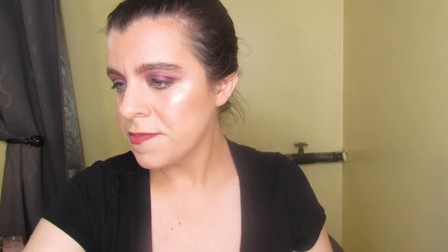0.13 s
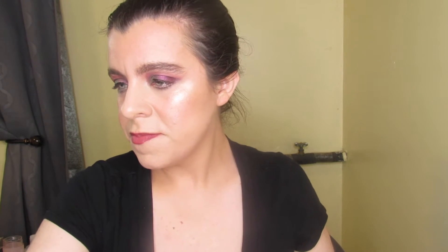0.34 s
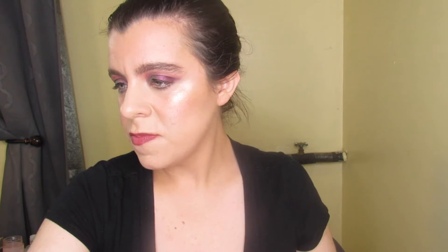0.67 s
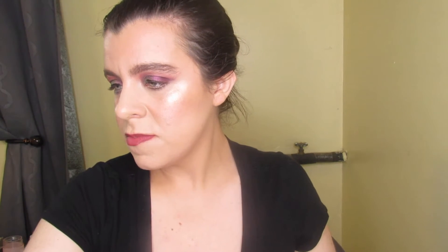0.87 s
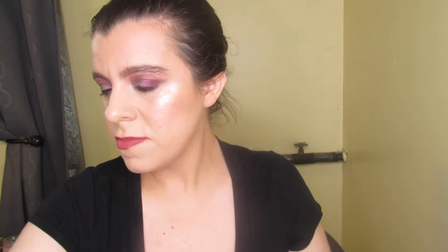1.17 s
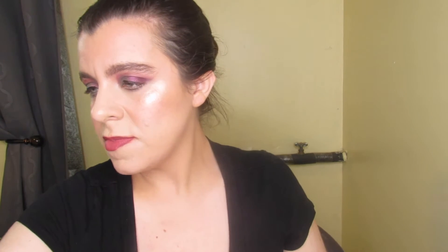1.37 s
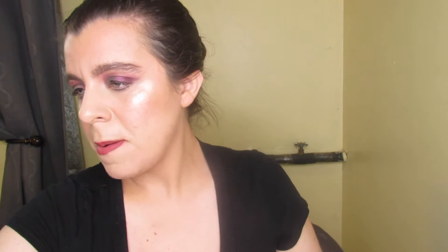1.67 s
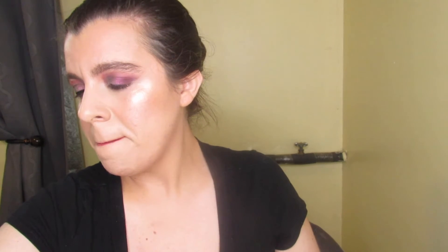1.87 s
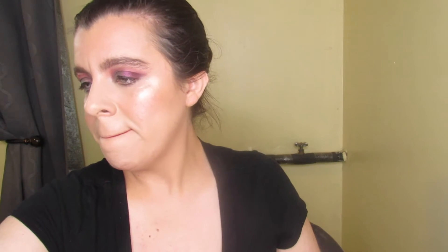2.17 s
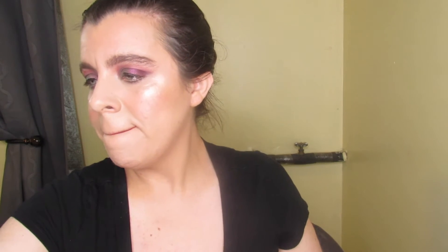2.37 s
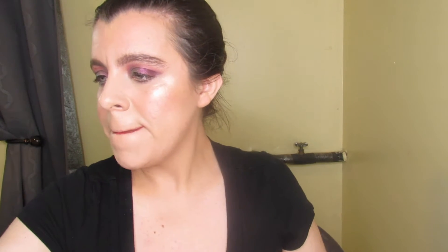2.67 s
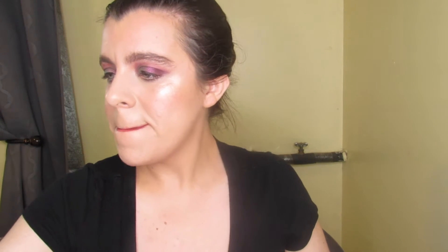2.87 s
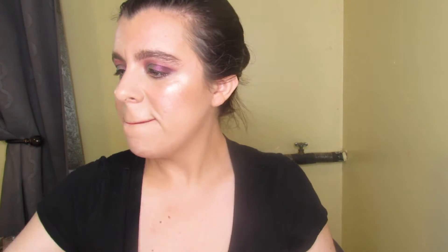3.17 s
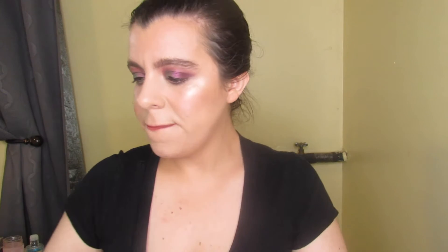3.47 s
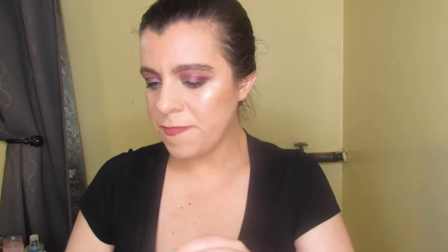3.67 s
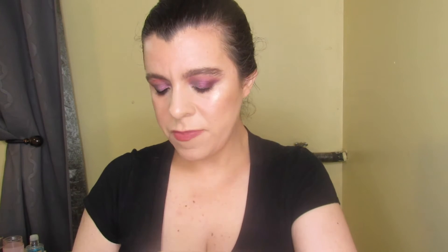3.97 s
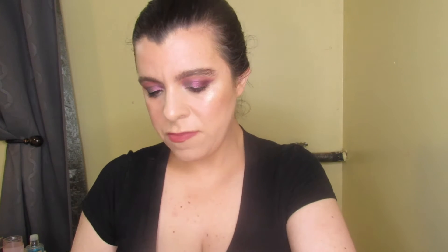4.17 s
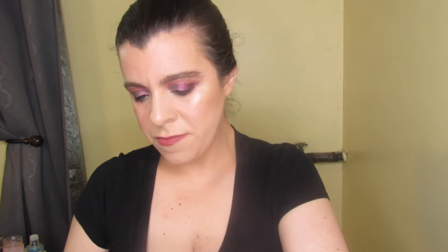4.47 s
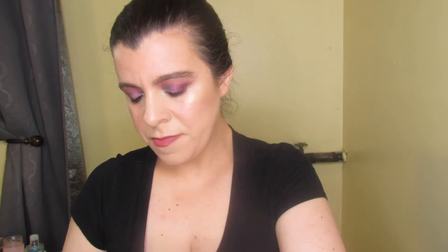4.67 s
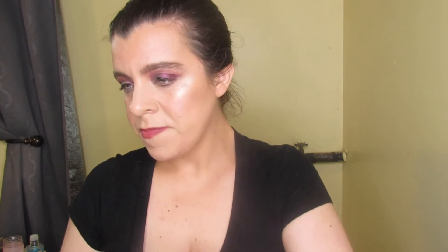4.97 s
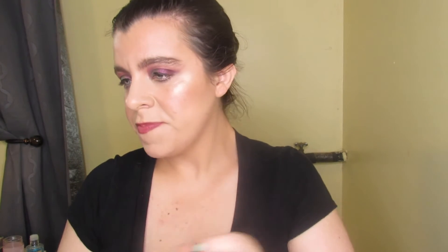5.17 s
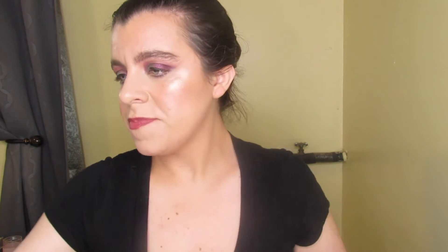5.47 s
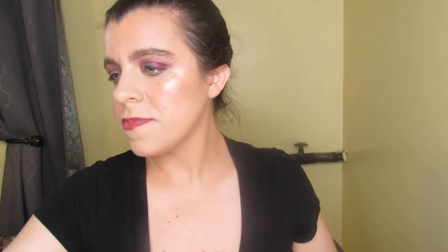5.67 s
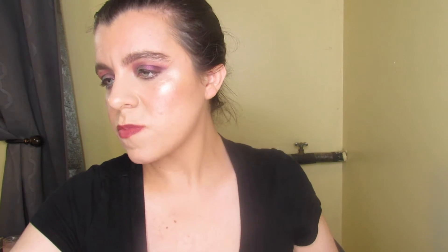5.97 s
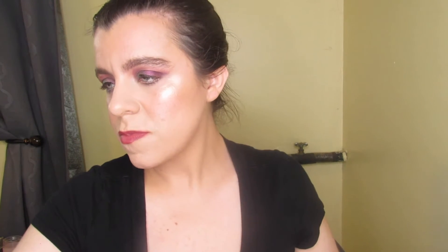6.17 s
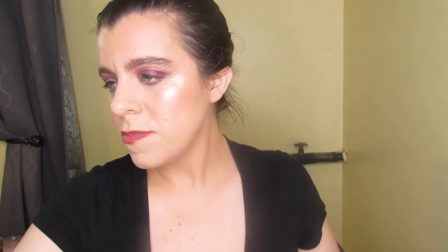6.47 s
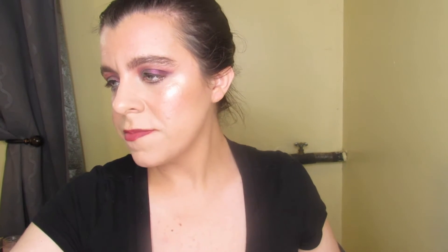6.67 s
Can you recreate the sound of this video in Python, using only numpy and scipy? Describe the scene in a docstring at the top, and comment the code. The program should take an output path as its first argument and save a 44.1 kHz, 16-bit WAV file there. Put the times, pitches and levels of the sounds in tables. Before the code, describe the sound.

Plastic make-up containers are handled on a table in a small bare room, close to a stereo microphone pair. Sharp clacks come in a cluster early on, then soft slides and nudges, a few light clicks in the hand, a bright rattling burst around the middle, and a final dense run of knocks with rubbing. A faint low hum lies beneath.

```python
"""A faint steady hum, a brief slide and a soft nudge open the scene; then plastic make-up containers are
picked up, knocked together and set down on a table in a small, bare room, close to the microphone pair.
Each contact is a short dense clack of shaped noise bands plus decaying sines: the container's clearer ring
and, as weight reaches the table, its boom. Slides are noise with uneven catches, also fed to table resonators.
The room tone is coloured noise with a few sine hum lines."""
import sys
import numpy as np
from scipy import signal
from scipy.io import wavfile
from scipy.ndimage import map_coordinates

SR = 44100
rng = np.random.default_rng(int(sys.argv[2]) if len(sys.argv) > 2 else 0)


def wav_out(sig):
    """Save sig, one row per channel (or a flat mono array), as 16-bit PCM at SR to the path in sys.argv[1]."""
    wavfile.write(sys.argv[1], SR, np.round(np.clip(np.atleast_2d(sig).T, -1, 1) * 32767).astype(np.int16))


N = 301203
TIME = np.arange(N) / SR
RING_SAMPLES, ATTACK_SAMPLES = 20000, 970
AGE = TIME[:RING_SAMPLES]   # seconds since a contact
BAND_EDGES_HZ = np.geomspace(22, 16500, 25)
BANDS_HZ = np.sqrt(BAND_EDGES_HZ[1:] * BAND_EDGES_HZ[:-1])


def from_db(db):
    """Decibels to gain."""
    return 10 ** (np.asarray(db) / 20)


def at_hz(points, hz, axis=1):
    """Read one column of a table along log frequency."""
    points = np.array(points)
    return np.interp(np.log(hz), np.log(points[:, 0]), points[:, axis])


def pan(db):
    """Left and right gains for a level difference."""
    return from_db([[db / 2], [-db / 2]])


def noise_bands(image):
    """Stereo noise in narrow bands, each of rms 1: bands x channels x N."""
    white = rng.standard_normal((2, 2, N))
    bands = []
    for k, hz in enumerate(BANDS_HZ):
        band_pass = signal.butter(2, BAND_EDGES_HZ[k:k + 2], "band", fs=SR, output="sos")
        mid, side = signal.sosfilt(band_pass, white[k % 2])
        alike = np.clip(at_hz(image, hz), -.99, .99)
        pair = np.sqrt(1 + alike) * mid + np.sqrt(1 - alike) * side * [[1], [-1]]
        pair = pair * pan(at_hz(image, hz, axis=2))
        bands.append(pair / pair.std())
    return np.array(bands, dtype=np.float32)


def coloured(bands, spectrum):
    """Sum noise bands to a spectrum given per Hz; rms about 1."""
    gains = from_db(at_hz(spectrum, BANDS_HZ)) * np.sqrt(BANDS_HZ)   # bands widen with frequency
    gains = gains / np.linalg.norm(gains)
    return np.einsum("b,bcn->cn", gains.astype(np.float32), bands)


# colour of the room tone: f/Hz, relative level/dB per Hz
ROOM_TONE = [(15, -57), (25, -25), (46, -11), (107, 0.5), (267, -6.5), (349, -10.5), (378, -9), (469, -7),
             (762, -23.5), (1020, -19), (1620, -25), (2060, -30), (5010, -40), (13900, -37), (15500, -71)]
# steady hum lines: f/Hz, level/dB before the common hum trim
HUM = [(96.9, -70.5), (597.5, -62), (834.4, -65), (1012, -61.5), (1130, -65.5), (1427, -68.5)]
# room tone at the microphones: f/Hz, left-right likeness (held within +-0.99), L-R level/dB
TONE_IMAGE = [(40, -2.6, 30), (84, -0.52, 3.5), (192, -0.82, 1.5), (430, -0.45, 2.5), (1210, 0.17, 0.5),
              (4000, 0.45, 1.5), (12000, -0.06, 0)]


def room_tone(air_db=-45.0, hum_trim_db=-2.0):
    """Steady rumble and hiss from coloured noise, with a few faint sine hum lines."""
    air = from_db(air_db) * coloured(noise_bands(TONE_IMAGE), ROOM_TONE)
    hum = np.zeros(N)
    for hz, db in HUM:
        line = np.sin(2 * np.pi * (hz * TIME + rng.random()))
        hum += from_db(db + hum_trim_db) * np.sqrt(2) * line   # root 2: rms 1
    return air + hum * pan(4.4)


# things are pushed across the table: t/s, length/s, rub level/dB, pressure on the table/dB re the rub
SLIDES = [(0.0, 0.038, -39, -7), (0.25, 0.22, -46.5, -5.5), (0.665, 0.034, -51.5, 13),
          (0.977, 0.035, -49, 11), (1.255, 0.14, -35, 0.5), (1.57, 0.17, -56, 0), (1.892, 0.25, -51, 6),
          (2.21, 0.12, -43.5, -6), (2.657, 0.26, -43.5, 0), (5.623, 0.065, -51, -6), (5.894, 0.5, -44, 4.5),
          (6.29, 0.3, -39, 5), (6.497, 0.19, -41, 11)]


def pushing(attack_s=0.027, release_s=0.069):
    """Each push gathers speed, holds, then dies away: how strongly it rubs, and drives the table."""
    rubbing, pressing = np.zeros((2, N))
    for s, length, db, pressure_db in SLIDES:
        attack = np.clip((TIME - s) / attack_s, 0, 1)
        release = np.exp(-np.clip((TIME - s - length) / release_s, 0, 20))
        rubbing += from_db(db) * attack * release
        pressing += from_db(db + pressure_db) * attack * release
    return rubbing, pressing


# colour of the sliding: f/Hz, relative level/dB per Hz
RUB = [(30, -55), (100, -23), (180, -5), (260, -2.5), (380, -6), (520, -4), (700, -12), (1200, -12),
       (2000, -17.5), (4000, -28.5), (12000, -38)]


def sliding(bands, rough_db=4.0, catches_per_s=45, rub_db=-5.5):
    """Things slide in small uneven catches, which set the table humming."""
    knots = np.cumsum(rng.exponential(1 / catches_per_s, size=900))
    catches = np.interp(TIME, knots, rng.standard_normal(len(knots)))
    rubbing, pressing = pushing()
    rub = from_db(rub_db + rough_db * catches) * coloured(bands, RUB)
    return rub * rubbing + table_hum(rub * pressing)


# table top: f/Hz, relative level/dB, t60/s (t60 is for blows; sliding uses one resonator width)
TABLE_MODES = [(186.7, -12.5, 0.34), (256.6, 0, 0.23), (286.2, -6, 0.12), (338, -9.5, 0.23),
               (367.5, -2.5, 0.22), (434, -17.5, 0.3), (486, -6, 0.1), (578, -15, 0.29)]


def table_hum(drive, table_db=2.0, width_hz=16):
    """Rubbing excites the table's modes, favouring those strong under the container in hand."""
    starts, favoured_hz, _ = zip(*IN_HAND)
    held = np.searchsorted(starts[1:], TIME)
    out = np.zeros((2, N))
    for hz, db, _ in TABLE_MODES:
        push = drive * from_db(db + table_db) * favour(hz, np.array(favoured_hz))[held]
        out += signal.lfilter(*signal.iirpeak(hz, hz / width_hz, fs=SR), push)
    return out


def favour(hz, favoured_hz, favour_db=11.0, favour_octaves=0.11):
    """Gain of a table mode: the one with an antinode under the container is driven hardest."""
    return from_db(favour_db * np.exp(-(np.log2(hz / favoured_hz) / favour_octaves) ** 2))


def table_boom(force, favoured_hz, table_db=-6.5, swell_s=0.0019):
    """The table's modes swell over a few milliseconds; every blow pushes the top the same way."""
    out = np.zeros((2, RING_SAMPLES))
    for hz, db, t60 in TABLE_MODES:
        gain = from_db(at_hz(force, hz) + db + table_db) * favour(hz, favoured_hz)
        out += gain * mode(hz, t60, swell_s, start_turns=0)
    return out


# soft nudges of things that stay on the table: t/s, clack level/dB, weight on the table/dB re the clack
NUDGES = [(0.002, -54.5, 6), (0.363, -56, 2), (1.405, -38.5, -1.5), (2.104, -46, 1), (2.197, -43, 5),
          (2.286, -40.5, -1), (2.318, -43, 4.5), (2.61, -42.5, 2.5), (2.769, -40.5, -1), (2.867, -46, 7.5),
          (5.998, -48.5, 8), (6.208, -48, 9.5), (6.288, -31.5, 2.5), (6.775, -44, -1)]


def nudges():
    """Dull soft contacts: all share one snap, tick, spot ring and clack decay."""
    snap_db, tick_db, ring_hz, t60_s = -13, -26, 1175, 0.048
    return [(s, db, weight, snap_db, tick_db, ring_hz, t60_s) for s, db, weight in NUDGES]


# containers click together in the hand, clear of the table:
# t/s, clack level/dB, snap/dB and tick/dB re the clack, spot ring f/Hz, clack t60/s
CLICKS = [(0.211, -58.5, 5.5, -8, 1017, 0.15), (1.141, -47, -8, -21, 1460, .1),
          (1.979, -50, 0.5, 4, 970, .076), (2.965, -49, -7, -20, 1443, 0.075),
          (3.067, -37, -4, -19, 1270, 0.039), (3.181, -29, -3.5, -21.5, 1530, .27),
          (3.324, -42, -10, -12.5, 2050, 0.16), (3.494, -37.5, -9.5, -23, 964, 0.083),
          (4.453, -56, -10, -20, 1090, .1), (4.748, -18.5, -1, -13, 930, 0.12),
          (4.921, -43, 3, -14, 1090, 0.045), (5.056, -26, -7.5, -22.5, 1594, .1),
          (5.124, -22.5, -12.5, -22, 1644, 0.072), (5.1466, -20, 0.5, -7, 1790, 0.11),
          (5.158, -14.5, -6.5, -22, 1700, 0.27), (5.346, -30, -2.5, -17.5, 1350, 0.13),
          (5.372, -20, -2, -7.5, 1430, .11), (5.602, -30.5, -1, -13.5, 2820, 0.043),
          (5.653, -37.5, -5.5, -21, 1800, 0.04)]


def clicks(weight_db=-14):
    """Containers click together in the hand, which passes little weight to the table."""
    return [(s, db, weight_db, snap, tick, hz, t60) for s, db, snap, tick, hz, t60 in CLICKS]


# a container meets the table: t/s, clack level/dB, then re the clack: weight on the table/dB,
# shell's snap/dB, edge's tick/dB; spot ring f/Hz, clack t60/s
KNOCKS = [(0.539, -47, -3.5, 6.5, -0.5, 1490, 0.077), (0.7742, -15.5, 2, -9, -20, 1626, 0.095),
          (0.8525, -16, -10.5, -10.5, -19.5, 1550, .18), (0.899, -31, 1, -1, -30, 1680, 0.12),
          (1.1651, -22, -10.5, 0, -14, 1373, .08), (1.199, -18, -4, -6, -14, 1230, .12),
          (1.252, -27.5, -6, -4, -33, 1200, 0.23), (1.3047, -22, -22, 0, -16, 1840, .19),
          (1.495, -38.5, -4, -11, -17, 1190, .082), (1.508, -27, -8.5, -22, -22, 1405, 0.066),
          (1.533, -25.5, -4.5, 1.5, -14.5, 1280, 0.051), (1.614, -36.5, -18, -13, -32, 1600, .11),
          (2.789, -25, 0.5, -11, -28.5, 1210, 0.18), (5.8464, -27.5, 3, -5.5, -16.5, 1850, 0.23),
          (5.949, -40, 1, -5, -20, 1290, 0.057), (6.046, -30, -7.5, -8.5, -23, 1096, 0.15),
          (6.143, -36, -12, -9, -31, 1290, 0.21), (6.245, -25, -17, -8, -20.5, 1130, .24),
          (6.265, -17, -6.5, -7, -26, 1100, 0.15), (6.478, -22.5, -1.5, -4, -18.5, 1170, 0.89),
          (6.5148, -20.5, 3, 3, -11, 1610, 0.098), (6.526, -29.5, 4.5, -4, -12, 1530, 0.081),
          (6.632, -21, -0.5, -0.5, -20.5, 1520, 0.074)]


def knocks():
    """Containers strike the table, each with its own weight, snap and tick."""
    return list(KNOCKS)


# where thump, knock, clack, snap and tick lie: f/Hz
REGISTERS_HZ = [250, 440, 1330, 3300, 8000]


def blow_force(db, weight, snap, tick, favoured_hz, thump_db=-8.5, thump_per_weight=1.77):
    """Spectrum of a blow, (f/Hz, level/dB): heavy ones thump, most on a deep-sounding spot of the table."""
    # weight sets the knock and, more steeply, the thump below it
    deep_db = 20 * np.log10(favour(REGISTERS_HZ[0], favoured_hz))
    thump = thump_db + thump_per_weight * weight + deep_db
    return np.column_stack([REGISTERS_HZ, db + np.array([thump, weight, 0, snap, tick])])


def dying(t60):
    """A decay of 60 dB in t60 seconds."""
    return np.exp(-np.log(1000) / t60 * AGE)


def swelling(seconds):
    """A rise from 0 to 1 with this time constant."""
    return 1 - np.exp(-AGE / seconds)


def unit_attack(x):
    """Scale a stereo ring to rms 1 over its first moments."""
    return x / np.sqrt(np.mean(x[..., :ATTACK_SAMPLES] ** 2, axis=(-2, -1), keepdims=True))


def rebounds(t60, gap_s=0.018, sting_s=0.00069, spread_db=-12.0, weaker_db=-6.5, count=5):
    """A light container never lands flat: after the first sting its edges touch again at uneven gaps."""
    out = np.exp(-AGE / sting_s)
    touches = np.cumsum(rng.exponential(gap_s, count))
    for s, size in zip(touches, rng.standard_normal(count)):
        # later touches tend to be weaker, with random spread
        gain = from_db(weaker_db + spread_db * min(size, 1) - 60 * s / t60)
        out += gain * (AGE >= s) * np.exp(-np.abs(AGE - s) / sting_s)
    return out


def clack(bands, levels_db, t60, room_tail, rise_s=0.0013, low_rise_cycles=0.069,
          rebound_db=-1.5, chatter_db=0.15, chatter_s=0.00564):
    """Dense shell modes as fast-dying noise with rebounds, over the room's tail; lows rise more slowly."""
    start = rng.integers(N - RING_SAMPLES)
    shape = dying(t60) + from_db(rebound_db) * rebounds(t60) + room_tail
    # uneven echoes make the decay lumpy
    lumps = map_coordinates(rng.standard_normal(size=400), [AGE / chatter_s], order=1)
    shape *= from_db(chatter_db * lumps)
    rise = rise_s + low_rise_cycles / np.maximum(BANDS_HZ, REGISTERS_HZ[0])[:, None]
    shape[:, :ATTACK_SAMPLES] *= 1 - np.exp(-AGE[:ATTACK_SAMPLES] / rise)
    noise = bands[:, :, start:start + RING_SAMPLES]
    rings = unit_attack(noise * shape[:, None].astype(np.float32))
    return np.einsum("b,bcn->cn", from_db(levels_db).astype(np.float32), rings)


def hollow(shell, modes, hollow_db=7.0, sharpness=15.5):
    """The clack gathers in humps around the container's main modes."""
    out = shell
    for hz, db in modes:
        hump = signal.lfilter(*signal.iirpeak(hz, sharpness, fs=SR), shell)
        out = out + from_db(db + hollow_db) * hump
    return out


# contacts at the microphones: f/Hz, left-right likeness (held within +-0.99), L-R level/dB
KNOCK_IMAGE = [(120, 1, 3), (276, 0.82, 9), (600, 0.8, 5), (1190, 0.83, 2), (2600, 0.99, .3),
               (5000, 0.93, 1), (8500, 0.33, 2), (12800, 0.027, 1.5)]


def mode(hz, t60, rise_s, start_turns):
    """One decaying sine as the two microphones get it."""
    wave = np.sin(2 * np.pi * (hz * AGE + start_turns)) * dying(t60) * swelling(rise_s)
    return unit_attack(wave * pan(at_hz(KNOCK_IMAGE, hz, axis=2)))


def container_ring(force, modes, ring_hz, ring_db=-9.5, ring_t60=0.054, modes_db=-4.0, modes_t60=0.18,
                   damping_slope=0.039):
    """The container's own modes, higher ones dying sooner, and one that depends on the spot struck."""
    spot_gain = from_db(at_hz(force, ring_hz) + ring_db)
    out = spot_gain * mode(ring_hz, ring_t60, rise_s=0.00028, start_turns=rng.random())
    for hz, db in modes:
        t60 = modes_t60 * (REGISTERS_HZ[2] / hz) ** damping_slope
        gain = from_db(at_hz(force, hz) + db + modes_db)
        out += gain * mode(hz, t60, rise_s=0.0023, start_turns=rng.random())
    return out


def add(out, s, sound):
    """Mix a sound in at a time."""
    start = max(round(s * SR), 0)
    out[:, start:start + RING_SAMPLES] += sound[:, :N - start]


# shell modes of each container: f/Hz, relative level/dB
JAR = [(1012, -24), (1152, -16), (1647, -5.5), (1824, -13), (2007, -15), (2094, -11.5), (2557, -15),
       (4516, -12), (5184, -10)]
PALETTE = [(968, -14.5), (1108, -16), (1211, -12), (1421, -23), (2099, -21), (2546, -23), (2863, -27),
           (3935, -14.5), (5496, -29)]
COMPACT = [(1453, -9), (1658, -15), (1824, -13.5), (1921, -22), (2438, -22), (2987, -14), (3423, -10),
           (4317, -17), (7865, -38)]
BOTTLE = [(974, -14), (1173, -8), (1577, -20), (1803, -7.5), (2325, -30), (2734, -16), (4064, -15),
          (4543, -34), (5943, -30)]
LIPSTICK = [(840, -3), (936, -4), (1308, -13), (1571, -13), (1684, -11), (1824, -15), (4581, -11)]
CASE = [(600, -25), (800, -4.5), (925, -3.5), (1351, -9), (1550, -8), (1706, -6), (2260, -17), (3003, -11),
        (3235, -12.5), (6217, -8.5)]
BOX = [(904, -23), (1012, -16), (1582, -15), (1695, -23), (2255, -8.5), (2976, -5), (4080, -7), (4371, -32),
       (5243, -14)]
LID = [(1108, -5), (1335, -9), (1491, -14), (1986, -15), (2217, -17), (2573, -30), (3870, -25), (5991, -30),
       (8327, -17)]
CAP = [(1162, -37), (1308, -14), (1593, -14), (1862, -9), (2697, -9), (2863, -5), (3676, -13), (4462, -17),
       (9302, -17)]
POT = [(1125, -2.5), (1297, -10), (1598, -8.5), (1824, -8), (2713, -19), (2810, -7), (3692, -8.5),
       (4419, -10), (5227, -10)]
TUB = [(952, -4.5), (1130, -3.5), (1577, -12), (1771, -12), (2131, -10), (2815, -11), (3025, -9),
       (4268, -13), (5178, -19)]
FLASK = [(1125, -3), (1431, -9), (1571, -7.5), (1803, -15), (2266, -8), (2906, -9.5), (4064, -20),
         (4220, -29), (7611, -28)]
PENCIL = [(1162, -7), (1324, -12), (1598, -5.5), (3692, -11), (6050, -3)]
BRUSH = [(1652, -12), (2007, -3), (2169, 2), (2481, -10)]
TUBE = [(834, -4), (1001, 0), (1361, -21), (1491, -4), (1706, -13), (2352, -7)]
STICK = [(1033, -10), (1448, -4), (1954, -13.5), (3434, -22), (3563, -32)]
# what is in hand: from t/s, table resonance favoured where it lands f/Hz, container's modes
IN_HAND = [(0, 258, STICK), (.7, 516, JAR), (1.05, 267, PALETTE), (1.28, 254, COMPACT), (1.85, 352, BOTTLE),
           (3.02, 302, PENCIL), (3.13, 304, LIPSTICK), (3.27, 300, BRUSH), (3.42, 300, TUBE),
           (4.5, 554, CASE), (4.86, 318, STICK), (5.0, 310, BOX), (5.3, 362, LID), (5.55, 303, CAP),
           (5.78, 503, POT), (6.18, 340, TUB), (6.4, 367, FLASK)]
# colour common to all contacts: f/Hz, relative level/dB per band
CONTACT_COLOUR = [(60, -44), (100, -7), (160, -17), (250, -3), (450, -3.5), (700, -6), (1050, -4.5),
                  (1600, -6), (2600, -4.5), (4200, -6), (6500, -3), (10000, 3), (14000, -23)]
# room decay: f/Hz, t60/s
ROOM_T60 = [(150, 0.35), (400, 0.31), (1100, 0.39), (2800, 0.31), (7300, .3), (14000, 0.27)]


def contacts(bands, room_db=-7.5, shell_db=-4.0):
    """Every contact: clack, the container's ring, and the table's boom."""
    out = np.zeros((2, N))
    room_tail = from_db(room_db) * swelling(0.022) * dying(at_hz(ROOM_T60, BANDS_HZ)[:, None])
    colour_db = shell_db + at_hz(CONTACT_COLOUR, BANDS_HZ)
    for s, db, weight, snap, tick, ring_hz, t60 in nudges() + clicks() + knocks():
        held = sum(s >= row[0] for row in IN_HAND[1:])
        _, favoured_hz, modes = IN_HAND[held]
        force = blow_force(db, weight, snap, tick, favoured_hz)
        shell = clack(bands, at_hz(force, BANDS_HZ) + colour_db, max(t60, .01), room_tail)
        ring = container_ring(force, modes, ring_hz)
        add(out, s, hollow(shell, modes) + ring + table_boom(force, favoured_hz))
    return out


# standing waves and a cancellation between table, walls and microphone: f/Hz, width/Hz, level/dB
NOOK = [(698, 94, -21), (1006, 21, 2.5), (1055, 13.3, -2), (1490, 25, -4.5), (1596, 15, 3.5),
        (1590, 8, 1.5), (1850, 19, -1), (2080, 150, 0), (2246, 110, -5), (3170, 54, 4), (3220, 880, -3.5),
        (4050, 360, -2)]


def nook(x):
    """Near surfaces lift some narrow bands and cancel others."""
    for hz, width, db in NOOK:
        b, a = signal.iirpeak(hz, hz / width, fs=SR)
        x = x + (from_db(db) - 1) * signal.lfilter(b, a, x)
    return x


def scene(bass_cut_hz=155):
    """Sliding and contacts on the table, over the room tone."""
    bands = noise_bands(KNOCK_IMAGE)
    things = nook(sliding(bands) + contacts(bands))
    # such small things radiate no deep bass
    bass_cut = signal.butter(4, bass_cut_hz, "high", fs=SR, output="sos")
    return room_tone() + signal.sosfilt(bass_cut, things)


def record(dry, cutoff_hz=15400):
    """The top is cut steeply."""
    return signal.sosfilt(signal.ellip(10, .1, 90, cutoff_hz, fs=SR, output="sos"), dry)


dry = scene()
out = record(dry)
wav_out(out)
```